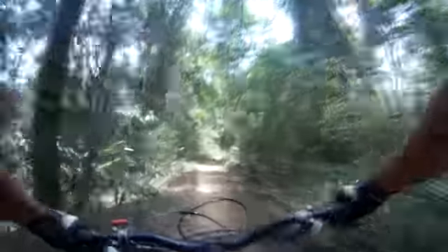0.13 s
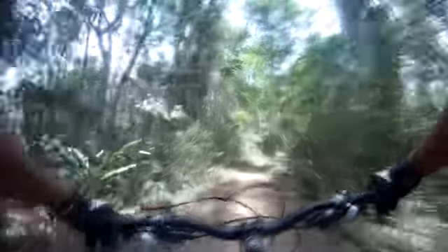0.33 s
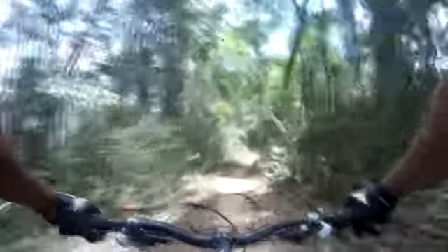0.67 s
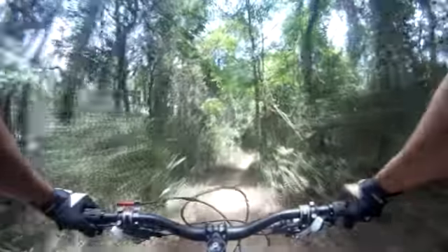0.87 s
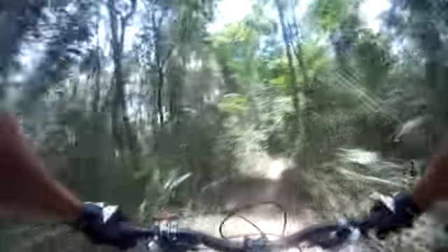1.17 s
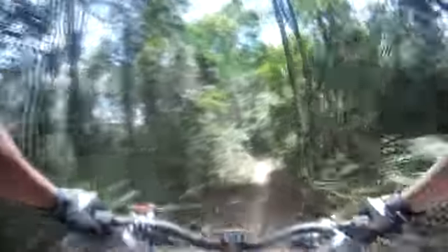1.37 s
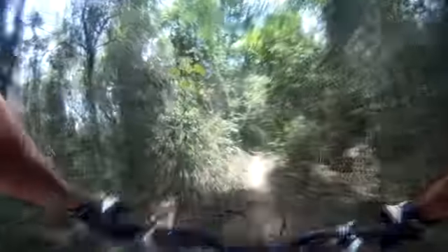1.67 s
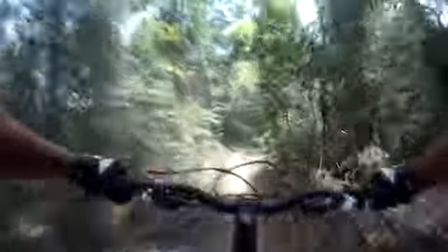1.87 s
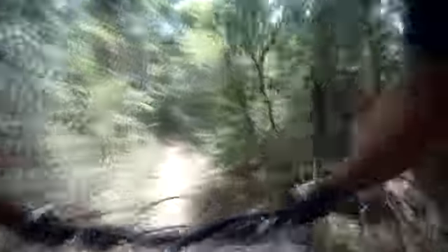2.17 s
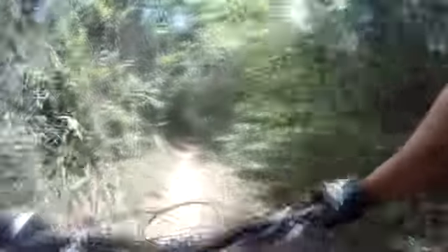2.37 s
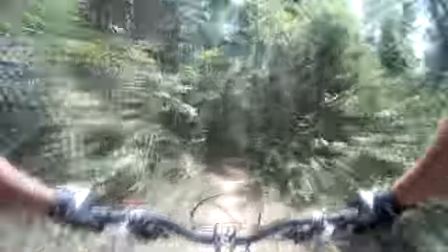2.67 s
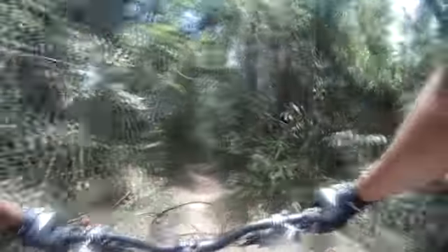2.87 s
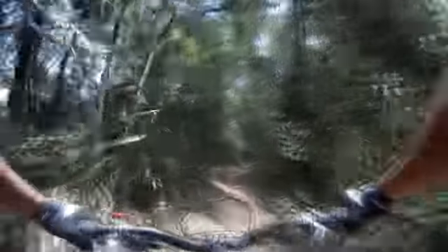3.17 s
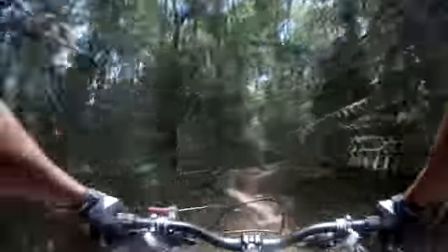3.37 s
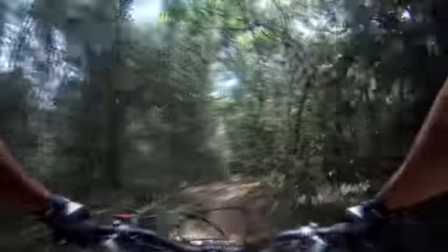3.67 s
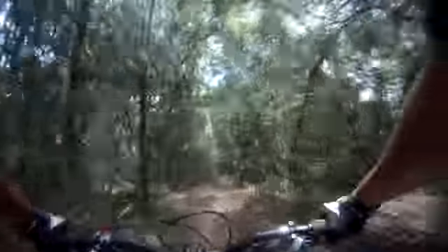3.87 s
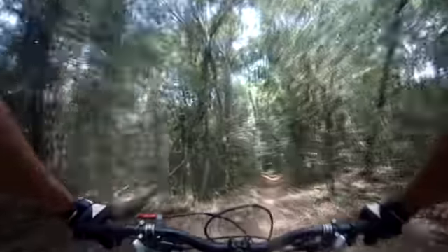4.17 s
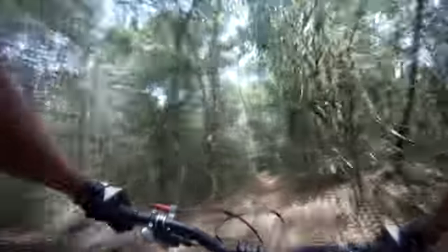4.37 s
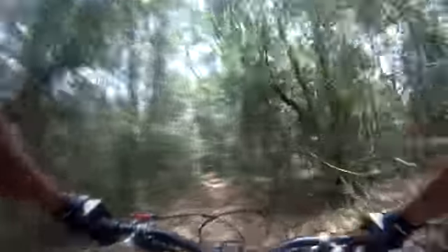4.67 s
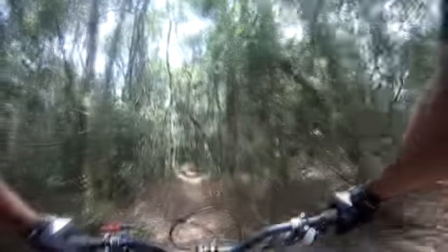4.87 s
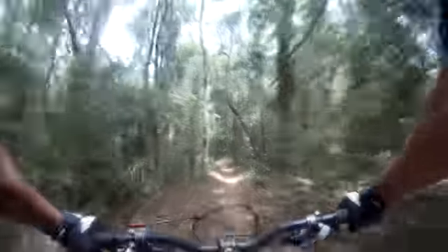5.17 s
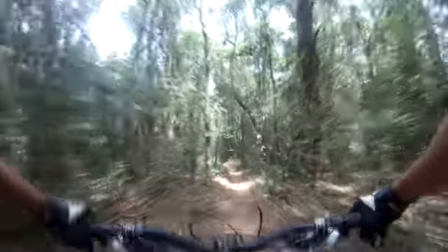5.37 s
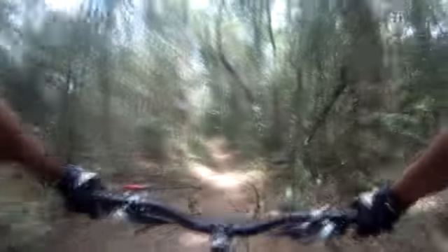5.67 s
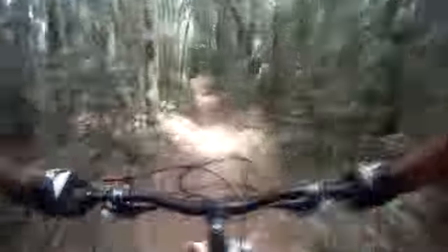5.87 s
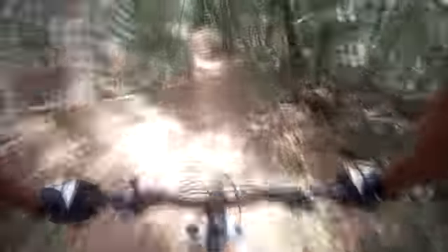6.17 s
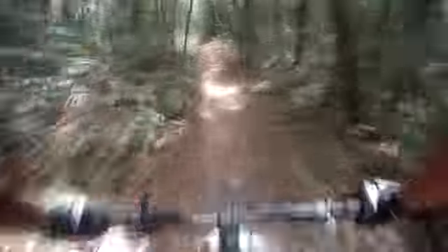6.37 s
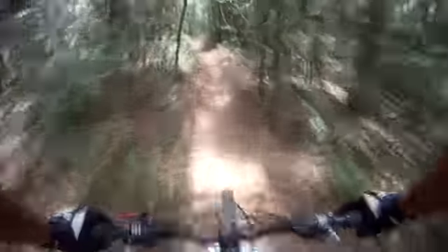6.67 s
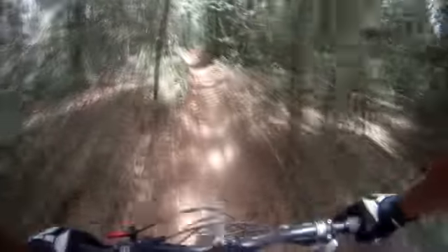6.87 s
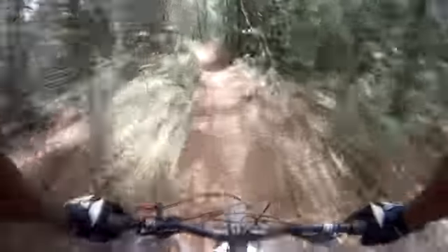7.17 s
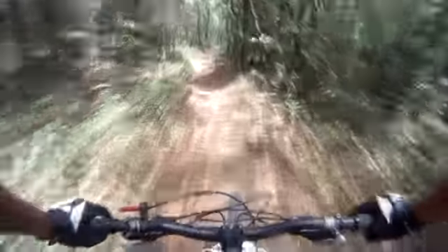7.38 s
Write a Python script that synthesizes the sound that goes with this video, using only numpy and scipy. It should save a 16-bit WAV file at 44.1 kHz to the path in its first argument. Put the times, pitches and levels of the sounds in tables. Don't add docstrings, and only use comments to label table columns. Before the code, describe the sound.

Close and boxy rough bike ride: quiet rumble and scratchy strap rustle swell with the bumps, a dull chest beat rocks steadily, and light buckle clicks tick irregularly. Very loud, short plastic cracks stand far above everything. The middle calms briefly, then rattling thickens and the roughest burst comes just after six seconds, before settling into rumble and rustle. Dry, enclosed sound with gritty, lo-fi treble and no echo.

```python
import sys
import numpy as np
from scipy import signal
from scipy.fft import rfft, irfft
from scipy.io import wavfile
from scipy.ndimage import uniform_filter1d

SR = 44100
rng = np.random.default_rng(int(sys.argv[2]) if len(sys.argv) > 2 else 0)


def store_pcm(level_fs):
    pcm = np.round(np.clip(level_fs, -1, 1) * 32767).astype(np.int16)
    wavfile.write(sys.argv[1], SR, np.atleast_2d(pcm).T)


def field_ratio(decibels):
    return 10 ** (np.asarray(decibels, dtype=float) / 20)


N = 331632


def level(x, db):
    return x * field_ratio(db) / np.sqrt(np.mean(x ** 2))


def band(x, lo_hz, hi_hz, order=2):
    return signal.sosfilt(signal.butter(order, [lo_hz, hi_hz], "band", fs=SR, output="sos"), x)


def ring(force, hz, db, t60):
    pole = np.exp(2j * np.pi * hz / SR - np.log(1000) / (t60 * SR))
    return field_ratio(db) * signal.lfilter([0, pole.imag], [1, -2 * pole.real, abs(pole) ** 2], force)


def ring_all(force, modes):
    return sum(ring(force, hz, db, t60) for hz, db, t60 in modes)


def decay(force, time_s):
    return signal.lfilter([1], [1, -np.exp(-1 / (time_s * SR))], force)


def blows(s, size):
    x = np.zeros(N)
    np.add.at(x, np.minimum((s * SR).astype(int), N - 1), size)
    return x


def walk(rate_hz):
    k = int(SR / rate_hz)
    held = np.repeat(rng.standard_normal(N // k + 1), k)
    return uniform_filter1d(uniform_filter1d(held, k), k)[:N]


def grit(per_s, scatter_db):
    hit = rng.random(N) < per_s / SR
    return hit * rng.standard_normal(N) * field_ratio(scatter_db * rng.exponential(size=N))


def peaks(s, db, rise, fall, hold=0):
    t = np.arange(0, N + 64, 64) / SR
    late = t[:, None] - s
    fade_db = np.minimum(late, 0) * rise - np.maximum(late - hold, 0) * fall
    gain = np.sqrt(np.sum(field_ratio(db + fade_db) ** 2, axis=1))
    return np.interp(np.arange(N) / SR, t, gain)


# start_s [s], roughness_db [dB]
TRAIL_ROUGHNESS = [(0, 0), (.5, 2), (.95, 5), (1.5, -1), (1.85, 4), (2.2, 7), (2.48, 11), (2.75, 4),
                   (3.3, -1), (4.2, -1), (4.6, 4), (5.15, 7), (5.68, 6), (6.0, 9), (6.3, 13), (6.55, 11),
                   (6.9, 7), (7.52, 9)]


def roughness():
    s, db = np.transpose(TRAIL_ROUGHNESS)
    return np.interp(np.arange(N) / SR, s, db)


# pitch_hz [Hz], level_db [dB per Hz]
HISS_SPECTRUM = [(120, -21), (200, -7), (695, -14.5), (936, -11.5), (1060, -7.5), (1170, -8.5), (1650, -12),
                 (2070, -9.5), (4380, -17.5), (5900, -20.5), (7670, -43), (13000, -120)]


def hiss():
    hz, db = np.transpose(HISS_SPECTRUM)
    log_hz = np.log(np.fft.rfftfreq(N, 1 / SR) + 1)
    shape_db = np.interp(log_hz, np.log(hz), db + 2.6 * (hz > 2000))
    return level(irfft(rfft(rng.standard_normal(N)) * field_ratio(shape_db), N), -65)


# start_s [s], level_db [dB], fade_db_s [dB/s]
TORSO_LEANS = [(.1, -37, 180), (.54, -38, 45), (1.13, -43, 170), (1.46, -45, 120), (1.8, -51, 90),
               (1.97, -40, 90), (2.53, -34, 140), (2.89, -42, 70), (3.18, -40, 140), (3.47, -49, 50),
               (3.94, -49, 20), (4.55, -40, 170), (4.84, -42, 90), (5.17, -43, 90), (5.34, -40, 125),
               (5.53, -40, 110), (6.1, -41, 30), (6.26, -31, 140), (6.51, -43, 70), (6.87, -45, 170),
               (7.2, -41, 80)]


def rumble(rough):
    low = band(np.cumsum(rng.standard_normal(N)), 55, 700, order=1)
    low = low + .9 * band(low, 60, 140) + .55 * band(low, 130, 330)
    low = low * field_ratio(2.5 * walk(19))
    deep = band(rng.standard_normal(N), 8, 31, order=4)
    sway = deep / np.sqrt(uniform_filter1d(deep ** 2, size=SR // 12))
    s, db, fade = np.transpose(TORSO_LEANS)
    low_gain = field_ratio(-60 + .35 * rough)
    sway_gain = np.hypot(field_ratio(-60.5 + .6 * rough), peaks(s, db + 1.5, fade, fade))
    return low_gain * level(low, 1.2) + sway_gain * level(sway, -1.5)


# start_s [s], level_db [dB], brightness_db [dB], hold_s [s]
STRAP_SCUFFS = [(.09, -65, -6, .04), (.46, -61, -3, .03), (.575, -63, -1, .025), (.772, -60, -15, .01),
                (.92, -69, 3, .04), (1.0, -62, -10, .04), (1.57, -58, -11, .05), (1.915, -56, -8, .03),
                (1.99, -53, -8, .03), (2.2, -56, -7, .03), (2.262, -54, -12, .012), (2.335, -55, -5, .025),
                (2.415, -57, -3, .03), (2.458, -51, -6, .05), (2.52, -52, -4, .02), (2.65, -53, -8, .045),
                (3.725, -60, -12, .06), (4.028, -57, -16, .015), (2.572, -55, -4, .012),
                (5.28, -59, -8, .04), (5.785, -55, -10, .02), (5.855, -60, -1, .05), (5.995, -55, -9, .03),
                (6.075, -53, -3, .045), (6.165, -51, -8, .04), (6.245, -48, -6, .05),
                (6.315, -50, -3, .035), (6.402, -47, -5, .045), (6.79, -57, -10, .03),
                (7.248, -53, -16, .006), (7.35, -57, -13, .05)]
# pitch_hz [Hz], level_db [dB], t60_s [s]
DULL_MODES = [(650, -18, .014), (890, -11, .018), (1070, -8, .016), (1320, -12, .012), (1820, -9, .016),
              (2080, -6, .016), (2520, -10, .013)]
BRIGHT_MODES = [(2850, -10, .008), (3430, -4.5, .014), (3680, -3, .015), (4700, -14, .005),
                (5250, -13, .007)]


def flicker(grains, modes):
    return sum(level(ring(grains * field_ratio(2.8 * walk(45)), hz, 0, t60), db) for hz, db, t60 in modes)


def rustle(rough):
    dull = grit(4000, 1.5) * field_ratio(1.8 * walk(60))
    fine = grit(4500, 1.9) * field_ratio(2.6 * walk(60))
    body = flicker(dull, DULL_MODES) + level(band(dull, 700, 3400), -8.5)
    top = flicker(fine, BRIGHT_MODES) + level(band(fine, 2400, 5600), -11)
    shivers = [(s, -53, -7, .015) for s, _, side, *_ in MOUNT_KNOCKS if side]
    s, db, bright_db, hold = np.transpose([*STRAP_SCUFFS, *shivers])
    rise, fall = 600, 480
    body_gain = np.hypot(field_ratio(-70 + rough), peaks(s, db, rise, fall, hold))
    top_gain = np.hypot(field_ratio(-78 + .8 * rough), peaks(s, db + bright_db, rise, fall, hold))
    return body_gain * band(body, 550, 5000, order=3) + top_gain * top


# pitch_hz [Hz], t60_s [s], front_swing [signed gain], back_swing [signed gain]
SHELL_MODES = [(627, .0365, -.019, .048), (1073, .026, .13, -.175), (1759, .0088, .9, -.98),
               (2006, .0082, -2.61, 2.61), (2124, .0202, .93, -1.17), (2162, .0124, .65, -.29),
               (2370, .012, -.17, -.03), (2578, .0244, .07, -.03), (3470, .014, -.10, .09),
               (3676, .02, .05, -.05), (150, .04, 0, -.09), (2520, .028, .035, .04), (3525, .02, .07, -.02),
               (4750, .011, -.06, 0)]


def shell(push, side=0):
    return sum(swing[side] * ring(push, hz, 0, t60) for hz, t60, *swing in SHELL_MODES)


# start_s [s], level_db [dB], shell_share_db [dB], treble_tilt_db [dB]
LONE_CLICKS = [(0.5906, -49, -10, -9), (0.778, -56, 11, -22), (1.0688, -55, 1, -11), (1.1818, -52, -6, -10),
               (1.5297, -43, -5, 3), (1.5843, -49, 2, -10), (1.9602, -53, -9, -8), (2.1412, -53, -3, -8),
               (2.219, -52, -4, -10), (2.2629, -30, 2, -8), (2.3404, -46, -5, -1), (2.5222, -37, -13, -4),
               (2.6242, -48, -6, -21), (2.7062, -42, -12, -8), (4.5053, -47, -11, 0),
               (4.6917, -52, -13, -6), (4.8757, -39, -14, -12), (4.8975, -38, -12, -8),
               (5.1735, -31, -16, -1), (5.5354, -53, 0, -14), (5.7737, -49, 0, 1), (5.8704, -48, -12, -15),
               (6.2602, -29, -11, -8), (5.898, -38, -12, -8), (6.4077, -44, 0, -11), (6.4469, -41, -3, -13),
               (6.5297, -52, -4, -17), (7.0091, -41.5, 0, -5)]
# start_s [s] of the main contact, level_db [dB], touch_before [ms],
# rebound_after [ms], rebound_db [dB]; 0 ms = none
BUCKLE_BOUNCES = [(.0522, -39, 2.5, 2.5, -9), (.4503, -48, 0, 2.5, -4), (.4572, -36, 0, 2.8, -2),
                  (1.2012, -43, 0, 3.8, -1), (1.2105, -40, 3.4, 1.5, -4), (1.7386, -53, 0, 3.2, -3),
                  (1.9987, -49, 0, 3.2, -3), (2.0806, -51, 0, 4, -3), (2.2667, -31, 0, 2.8, -3),
                  (2.3968, -43, 2.8, 3, 1), (2.5256, -29, 1.8, 1.5, -7), (2.5982, -29, 0, 4, -1),
                  (2.7009, -35, 3, 2.5, -4), (2.8932, -55, 0, 4.2, -3), (3.7196, -35, 1.5, 2, -6),
                  (4.3606, -38, 0, 4.3, -2), (4.8908, -33, 3, 2.1, -3), (5.0683, -41, 7, 5, -6),
                  (5.1121, -36, 2, 2.5, -3), (5.7904, -29, 2.5, 2.1, -1), (5.8958, -36, 0, 4.4, 2),
                  (5.9084, -40, 3.2, 0, -3), (5.976, -23, 0, 6.3, -11), (6.0829, -34, 2.9, 0, -3),
                  (6.0876, -25, 0, 2, -8), (6.0989, -39, 3.5, 0, -3), (6.1699, -32, 1.5, 4.1, -2),
                  (6.3166, -29, 2, 2.5, -4)]
BUCKLE_TICKS = [.0984, .7694, .88, 1.3513, 1.6922, 2.8505, 2.9349, 3.0058, 3.1185, 3.4352, 3.5294, 3.8154,
                3.9073, 4.004, 4.6285, 4.8409, 4.9354, 5.0009, 5.3272, 7.1824]


def contacts():
    s, db, before_ms, after_ms, rebound_db = np.transpose(BUCKLE_BOUNCES)
    touch_db = db - 8 - 99 * (before_ms < 1)
    rebound_db = db + rebound_db - 99 * (after_ms < 1)
    ticks = len(BUCKLE_TICKS)
    s = np.r_[s, s - before_ms * 1e-3, s + after_ms * 1e-3, BUCKLE_TICKS]
    db = np.r_[db, touch_db, rebound_db, np.full(ticks, -55.5)]
    faint = np.arange(len(s)) >= len(s) - ticks
    share_db, tilt_db = 2 * rng.standard_normal((2, len(s)))
    share_db = share_db + np.where(faint, -8, -19)
    tilt_db = tilt_db + np.where(faint, -4, -7)
    return np.c_[np.transpose(LONE_CLICKS), np.array([s, db, share_db, tilt_db])]


# pitch_hz [Hz], level_db [dB], t60_s [s]
BUCKLE_MODES = [(2330, -7, .006), (2898, -5.5, .006), (3400, -3, .011), (3660, -3, .012), (4600, -13, .005),
                (5200, -9, .004)]
# pitch_hz [Hz], level_db [dB], t60_s [s]
PANEL_MODES = [(180, -32, .03), (390, -29, .016), (510, -33, .014), (870, -24, .011), (1380, -24, .012)]


def rattle():
    s, db, share_db, tilt_db = contacts()
    chance = rng.standard_normal((3 * len(BUCKLE_MODES) + 1, len(s)))
    metal = np.zeros(N)
    for k, (hz, mode_db, t60) in enumerate(BUCKLE_MODES):
        size_chance, lag_chance, gap_chance = chance[3 * k:3 * k + 3]
        tilted_db = db + .6 * (tilt_db + 6) * np.log2(hz / 3600)
        size = field_ratio(tilted_db + 1.9 * size_chance) * np.sign(lag_chance)
        first = s + .0004 * abs(lag_chance)
        second = first + .0009 * (1 + abs(gap_chance))
        metal += ring(blows(first, size) + blows(second, -.4 * size), hz, mode_db, t60)
    burst = decay(blows(s, field_ratio(db)), .0026) * level(band(rng.standard_normal(N), 2200, 5200), -8.5)
    push = blows(s - .0008, field_ratio(db + share_db) * np.sign(chance[-1]))
    body = shell(push) + field_ratio(11) * ring_all(push, PANEL_MODES)
    return field_ratio(-1.2) * metal + burst + field_ratio(-1.5) * body


# start_s [s], level_db [dB], pitch_hz [Hz], direction [+-1]
CHEST_BEATS = [(0.113, -35, 55, 1), (0.439, -37, 66, 1), (0.778, -34, 99, 1), (1.128, -32, 73, -1),
               (1.464, -34, 68, -1), (1.802, -39, 76, -1), (2.146, -37, 74, -1), (2.469, -38, 89, 1),
               (2.821, -29, 67, -1), (3.161, -31.5, 62, -1), (3.48, -36, 67, 1), (3.838, -32, 74, 1),
               (4.177, -34.5, 67, 1), (4.523, -34, 69, -1), (4.856, -34, 53, -1), (5.217, -41, 70, -1),
               (5.533, -39, 59, -1), (5.855, -38, 90, 1), (6.188, -36, 106, -1), (6.534, -35, 70, 1),
               (6.882, -37, 63, -1), (7.192, -36, 57, -1)]
BODY_JOLTS = [(0.077, -34, 57, -1), (.422, -37, 105, 1), (2.115, -38, 85, -1), (2.283, -37, 93, -1),
              (2.515, -41, 127, 1), (2.577, -37, 118, -1), (3.502, -37, 95, -1), (3.818, -39, 80, 1),
              (4.491, -40, 86, -1), (5.797, -40, 73, 1), (5.926, -41, 74, -1), (6.09, -40, 57, -1),
              (6.123, -39, 66, -1), (6.157, -41, 54, -1), (6.264, -23, 58, 1), (6.301, -34, 95, 1),
              (6.474, -32.5, 92, -1), (6.687, -41, 79, -1), (7.249, -36.5, 141, -1), (7.393, -36, 109, 1)]
ROOT_JOLTS = [
    (2.268, -38, 260, 1),
    (2.459, -37, 130, 1),
    (6.238, -26, 135, 1),
    (6.247, -30, 170, 1),
    (6.274, -25, 60, -1),
]
CHEST_SWINGS = [(.096, -37, 85, -1), (1.1, -41, 70, 1), (1.115, -37, 79, -1), (1.137, -39, 50, 1),
                (1.438, -36, 62, -1), (2.135, -40, 113, -1), (2.798, -38, 50, -1), (3.137, -41, 48, -1),
                (3.46, -42, 59, 1), (4.151, -42, 51, -1), (4.185, -37, 63, -1), (4.505, -40, 96, 1),
                (4.831, -37, 61, -1), (5.183, -37, 69, 1), (5.19, -38, 64, -1), (5.772, -40, 75, 1),
                (6.063, -43, 62, 1), (6.101, -41, 45, 1), (6.251, -31, 124, 1), (6.294, -35, 45, -1),
                (6.344, -42, 58, 1), (6.501, -43, 82, -1), (6.516, -41, 94, -1), (7.22, -36, 61, -1),
                (7.367, -43, 98, -1)]


def thuds():
    out = np.zeros(N + SR)
    t = np.arange(-SR // 16, SR // 16) / SR

    def swing(hz, way, cycles):
        return way * np.cos(2 * np.pi * hz * t) * np.exp(-(t * hz / cycles) ** 2)

    recoils = [(s + .005, db, 138 if side else 112, -1) for s, _, side, db, _ in MOUNT_KNOCKS]
    for s, db, hz, way in [*CHEST_BEATS, *BODY_JOLTS, *ROOT_JOLTS, *recoils]:
        noise = level(band(rng.standard_normal(len(t)), 40, 110, order=4), -12 - .09 * hz)
        shudder = noise * np.exp(-((t + .012) / .018) ** 2)
        out[int((s + t[0]) * SR):][:len(t)] += field_ratio(db) * (shudder + swing(hz, way, .6))
    for s, db, hz, way in CHEST_SWINGS:
        out[int((s + t[0]) * SR):][:len(t)] += field_ratio(db) * swing(hz, way, .42)
    return out[:N]


# start_s [s], length_s [s], above_hz [Hz]
TREBLE_DROPOUTS = [
    (.632, .012, 1600),
    (2.783, .007, 4500),
    (4.909, .011, 3200),
    (5.368, .014, 1500),
    (5.403, .008, 2800),
    (6.35, .012, 4000),
]


def dip_treble(x):
    t = np.arange(N) / SR
    for s, length, hz in TREBLE_DROPOUTS:
        gate = uniform_filter1d(((t > s) & (t < s + length)) * 1., size=SR // 500)
        part = slice(int((s - .05) * SR), int((s + .05) * SR))
        high_pass = signal.butter(4, hz, "high", fs=SR, output="sos")
        treble = np.zeros_like(x)
        treble[:, part] = signal.sosfiltfilt(high_pass, x[:, part])
        x = x - gate * treble
    return x


# start_s [s], length_s [s], level_db [dB], top_hz [Hz]
CHIRP_SPRAYS = [
    (.644, .005, -53, 9000),
    (.656, .022, -54, 15000),
    (5.393, .008, -63, 12000),
    (5.411, .014, -63, 9000),
    (6.372, .006, -60, 9000),
]


def spray():
    out = np.zeros(N)
    lead_s, low_hz = .01, 3200
    for s, length, db, top_hz in CHIRP_SPRAYS:
        when, pitch, size = rng.random((3, 24))
        late = np.arange(SR // 20)[:, None] / SR - lead_s - when * length
        hz = low_hz + pitch * (top_hz - low_hz)
        gain = field_ratio(db - 9 * size) * np.sqrt(length / .022)
        chirps = gain * np.exp(-(late / .0022) ** 2) * np.sin(2 * np.pi * hz * late)
        out[int((s - lead_s) * SR):][:SR // 20] += chirps.sum(axis=1)
    return out


MOUNT_KNOCKS = [
    (0.65051, -0.5, 0, -32, 7),
    (1.85649, -13.3, 1, -55, 5),
    (2.31538, -21.4, 0, -50, -2),
    (2.76981, -0.0, 0, -35, -3),
    (4.89873, -0.3, 0, -38, -3),
    (5.16301, -5.2, 1, -50, -2),
    (5.38606, -1.0, 0, -41, -1),
    (6.3648, -0.2, 0, -42, 3),
]
# pitch_hz [Hz], level_db [dB], t60_s [s]
EDGE_MODES = [(2400, -12, .006), (3500, -28, .013), (3800, -20, .010), (5500, -27, .005)]


def knocks():
    s, db, side, _, loose_db = np.transpose(MOUNT_KNOCKS)
    front = blows(s, field_ratio(db + .8) * (side == 0))
    back = blows(s, field_ratio(db + .8) * (side == 1))
    hard_db = 1.6 * db - side
    hard = blows(s + .0003, field_ratio(hard_db))
    bitten = blows(s + .0003, field_ratio(hard_db + loose_db))
    near_back = uniform_filter1d(back, size=SR // 500) > 0
    top_push = bitten * (1 - .6 * near_back)
    edge = np.zeros(N)
    for k, mode in enumerate(EDGE_MODES):
        way = 1 if k == 2 else -1
        edge += way * ring(hard if k < 3 else top_push, *mode)
    crack = decay(bitten, .0028) * level(band(rng.standard_normal(N), 2500, 5700), -32)
    shake = blows(s + .0002, field_ratio(db - 3 + (7 + loose_db) * side) * (2 * side - 1))
    late = np.arange(N) / SR - s[:, None]
    build = 1 - np.sum(np.exp(-(late / .00045) ** 2), axis=0)
    return build * (shell(front) + shell(back, side=1) + edge + crack + ring_all(shake, PANEL_MODES))


# start_s [s], level_db [dB], pitch_hz [Hz]
CASE_RINGS = [(1.008, -52, 2060), (1.85695, -35, 1075), (1.864, -43, 620), (1.876, -46, 1980),
              (1.933, -50, 2080), (1.942, -50, 2080), (1.989, -46, 2080), (2.009, -47, 1070),
              (2.012, -49, 2080), (2.263, -39, 1070), (2.264, -43, 620), (2.274, -45, 1750),
              (2.3152, -40, 1075), (2.208, -48, 2080), (2.226, -50, 3550), (2.236, -48, 2050),
              (2.415, -52, 890), (2.429, -48, 1850), (2.466, -44, 2080), (2.472, -48, 1050),
              (2.476, -43, 2080), (2.486, -40, 2080), (2.5, -43, 2100), (2.505, -49, 1250),
              (2.532, -46, 2100), (2.656, -47, 1950), (2.661, -46, 2100), (2.673, -51, 1070),
              (3.497, -56, 2050), (3.928, -54, 900), (4.03, -49, 1070), (5.168, -36, 3680),
              (5.999, -46, 2080), (6.102, -41, 2080), (6.11, -44, 2080), (6.145, -49, 1850),
              (6.183, -47, 1070), (6.192, -44, 2080), (6.241, -42, 1070), (6.25, -42, 900),
              (6.262, -44, 1850), (6.283, -47, 3600), (6.291, -49, 1070), (6.344, -46, 3600),
              (6.41, -46, 3600), (6.425, -46, 3600), (6.3, -44, 2080), (6.329, -43, 2100), (6.33, -46, 1070),
              (6.337, -41, 2080), (6.348, -45, 1070), (6.406, -41, 2120), (6.412, -44, 1070),
              (6.423, -39, 2030), (6.427, -46, 2520), (6.436, -44, 2100), (6.811, -52, 2080),
              (7.247, -44, 1070), (7.356, -50, 1070), (7.401, -53, 950)]


def taps():
    out = np.zeros(N + SR)
    t = np.arange(SR // 25) / SR
    rise_s, t60_s = .0012, .019
    shape = (1 - np.exp(-t / rise_s)) * np.exp(-np.log(1000) * t / t60_s)
    for s, db, hz in CASE_RINGS:
        out[int(s * SR):][:len(t)] += field_ratio(db + .3) * shape / shape.max() * np.sin(2 * np.pi * hz * t)
    return out[:N]


def scene():
    rough = roughness()
    steady = hiss() + rumble(rough) + rustle(rough)
    return (steady + rattle() + thuds() + knocks() + taps())[None]


def top_cut(x):
    return signal.sosfilt(signal.butter(12, 15690, fs=SR, output="sos"), x)


def record(dry):
    hold_hz, steps = 12000, 4
    guard = signal.butter(4, 6100, fs=SR, output="sos")
    slow = signal.resample_poly(signal.sosfiltfilt(guard, dry), hold_hz, SR, axis=1)
    held = np.repeat(np.clip(slow, -.9, .9), steps, axis=1)
    out = signal.resample_poly(held, SR, steps * hold_hz, axis=1)[:, 1:N + 1]
    out = np.pad(out, ((0, 0), (0, N - out.shape[1])))
    out = signal.sosfiltfilt(signal.butter(8, 15400, fs=SR, output="sos"), out)
    return top_cut(np.clip(dip_treble(out) + spray(), -1, 1))


dry = scene()
out = record(dry)
store_pcm(out)
```